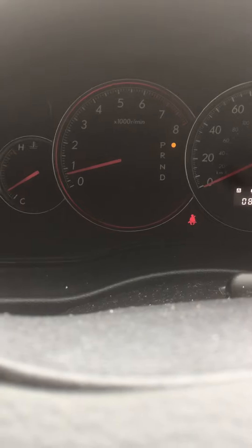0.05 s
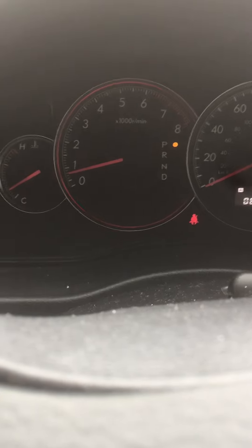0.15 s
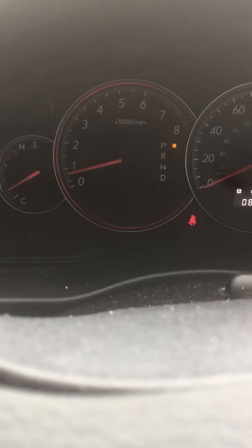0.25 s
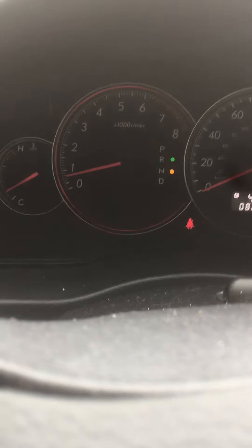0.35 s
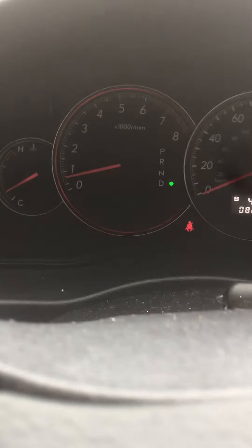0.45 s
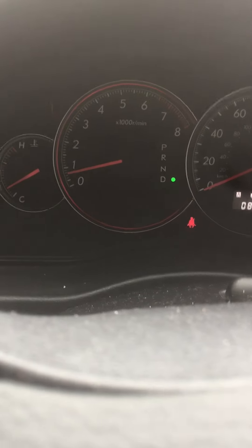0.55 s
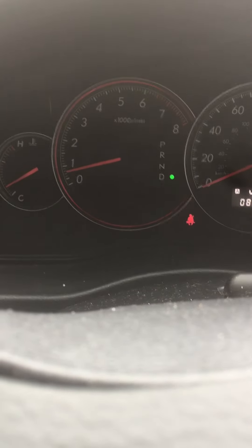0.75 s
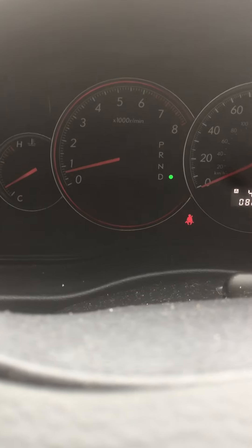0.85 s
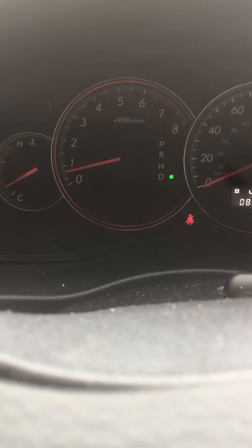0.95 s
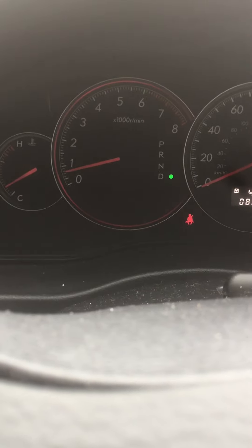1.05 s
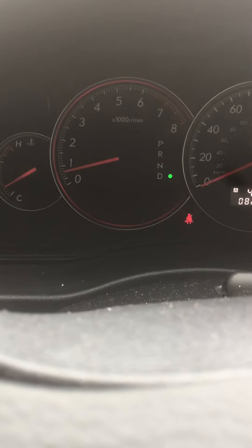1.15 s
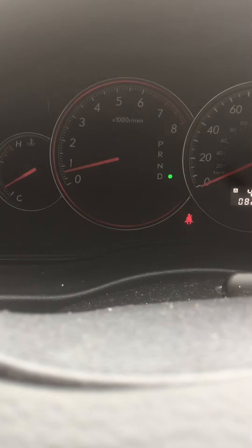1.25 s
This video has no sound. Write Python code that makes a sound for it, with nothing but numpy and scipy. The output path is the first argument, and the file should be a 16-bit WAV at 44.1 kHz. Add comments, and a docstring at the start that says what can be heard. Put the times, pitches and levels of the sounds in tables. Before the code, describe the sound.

A car's gear lever is shifted, heard inside the cabin over a low idling engine and faint fan hiss. The lock button clicks lightly from about 0.1 to 0.3 seconds. From 0.35 to 0.5 seconds the lever clatters loudly over plastic notches with hollow thumps, ending in a tiny spring buzz. From around 1 second the engine slows slightly and rumbles more roughly.

```python
"""Inside an idling car, the gear lever is pulled from park to drive.
The turning engine hums under the faint hiss of a fan. The lock button clicks, then the lever
clatters over its notches in bursts of tiny plastic hits and thumps the hollow console.
A spring buzzes as the lever settles, and there is a soft rustle before and after the shift.
As the gear takes hold, the engine slows a little and rumbles more roughly."""
import sys
import numpy as np
from scipy import signal
from scipy.fft import rfft, irfft
from scipy.io import wavfile
from scipy.ndimage import uniform_filter1d

SR = 44100
rng = np.random.default_rng(int(sys.argv[2]) if len(sys.argv) > 2 else 0)


def store_pcm(level_fs):
    """Save levels as 16-bit WAV."""
    pcm = np.round(np.clip(level_fs, -1, 1) * 32767).astype(np.int16)
    wavfile.write(sys.argv[1], SR, np.atleast_2d(pcm).T)


N = 57330
T = np.arange(N) / SR
HZ = np.fft.rfftfreq(N, 1 / SR)

# Levels in the tables are relative. A "fade" is the time a sound takes to drop by 60 dB.
# the engine over time: t/s, shaft speed f/Hz, hum level/dB, rumble level/dB
ENGINE_COURSE = [(0, 25.23, -1.5, -26), (0.151, 25.19, -4.5, 6), (0.268, 26.45, -19, 12.5),
                 (0.518, 26.28, 4, 4.5), (0.612, 26.7, -8, -10.5), (0.691, 25.02, 4, -9),
                 (0.818, 25.73, -2.5, 2.5), (0.971, 25.09, -0.5, -6), (1.04, 24.42, 3, 5),
                 (1.15, 23.56, -5.5, 8.5), (1.222, 25.47, 6, 7), (1.3, 24, -6, 10)]
# tones of the hum: multiple of the shaft speed, level/dB
HUM_TONES = [(2, -38.5), (3, -44), (4, -44.5), (5, -51.5), (6, -60.5), (7, -56.5), (8, -59.5)]
# tone colours of the engine's rumble and the fan's hiss: f/Hz, level/dB
RUMBLE_COLOUR = [(20, -29), (36, -12), (50, 10.5), (80, 0.5), (115, 4.5), (160, -5.5), (205, -3),
                 (260, -12), (350, -18.5), (480, -29.5), (800, -28.5), (1200, -49), (2500, -49),
                 (6000, -96)]
FAN_COLOUR = [(180, -25.5), (300, 0), (348, 2), (385, -17), (462, -7.5), (555, -21), (593, -12),
              (667, -15.5), (978, -8.5), (1170, -23), (1360, -22.5), (1610, -23.5), (16000, -42)]
# pitch bands of the air ducts and of the rustles: f/Hz, width/Hz, level/dB
DUCT_BANDS = [(343, 85, -69.5), (950, 33, -71.5), (1342, 65, -77.5)]
RUSTLING_BANDS = [(740, 1000, 2), (2150, 860, -4), (3700, 1900, -5.5)]
# soft rustles: t/s, hold/s, level/dB
RUSTLE_TIMES = [(0.0, 0.028, -64), (0.736, .03, -73.5)]
# lock button and slack in the lever: t/s, rise/s, hold/s, clack level/dB, ring level/dB, tick level/dB
BUTTON_CLICKS = [(0.133, .01, 0.0094, -55, -62, -64.5), (0.154, 0.0035, .005, -49.5, -49, -59),
                 (0.164, 0.002, 0.024, -57.5, -54.5, -62.5), (0.1922, .0015, 0.0046, -41.5, -40.5, -48),
                 (0.212, 0.0021, 0.014, -45.5, -45, -49.5), (0.225, 0.00033, 0.00096, -44, -43, -57),
                 (0.291, .002, 0.0039, -67, -50, -68), (0.311, 0.0013, 0.0024, -49.5, -44, -85)]
# the lever passing its notches: same columns as the clicks
NOTCHES = [(0.3475, 0.0038, 0.0032, -22.5, -23.5, -36.5), (0.3535, 0.0008, 0.0012, -36, -25, -34.5),
           (0.3660, 0.0015, 0.0023, -33.5, -32.5, -43.5), (0.3828, 0.00088, 0.008, -36.5, -33, -42.5),
           (0.3912, 0.006, 0.016, -34, -41, -50.5), (0.4105, 0.0034, 0.006, -29, -20.5, -31.5),
           (0.4465, 0.0032, .003, -28.5, -24.5, -35.5), (0.4515, 0.0011, 0.0034, -25.5, -27, -34),
           (0.4670, 0.0016, 0.0033, -34, -32.5, -45.5), (0.475, 0.0023, 0.0055, -50, -53, -60)]
# ringing tones of the lever and its gate, the slot it slides in: f/Hz, level/dB, fade/s (capped below)
GATE_TONES = [(650, -10, 0.068), (720, -16, 0.059), (794, 12, 0.052), (806, -5, 0.06), (958, 3.5, 0.034),
              (1101, -0.5, 0.071), (1357, -5.5, 0.067), (1378, 2, 0.022), (1680, -16, 0.031),
              (1650, -0.5, 0.063), (1962, -9, 0.063), (2370, -31, 0.069)]
# tone colours of the woody clack, the trim panel and the bright tick: f/Hz, level/dB
CLACK_COLOUR = [(200, -31.5), (450, -9), (620, -0.5), (900, -2), (1400, -4.5), (1900, -1.5), (2300, -13),
                (2700, -20.5), (4000, -46), (16000, -67)]
PANEL_COLOUR = [(120, -28.5), (230, -4), (300, -0.5), (390, -2.5), (480, -24.5), (900, -40), (4000, -83)]
TICK_COLOUR = [(300, -35.5), (1500, -8), (2600, -3), (4000, 4), (4900, -3), (5900, 2), (7500, -5),
               (9500, -6.5), (11000, -9), (13500, -9), (16000, -15.5)]
# the lock's catch snapping free: t/s, fade/s, level/dB
CATCH_SNAP = (0.2305, 0.024, -42)
# tone colour of that snap: f/Hz, level/dB
CATCH_COLOUR = [(2500, -20), (3800, -1), (4600, 4), (5400, 3.5), (6300, -12), (7300, -3), (8700, -10),
                (9500, 7.5), (10300, -24), (12900, -6), (15500, -26)]
# the lever's linkage leaving park: t/s, f/Hz, level/dB, fade/s, rise/s
LINKAGE_BUMP = (0.33, 112, -9, 0.11, 0.14)
# blows that reach the console: t/s, level/dB
CONSOLE_BLOWS = [(0.3484, -21.5), (0.3613, -12), (0.4006, -15.5), (0.4073, -16), (0.4217, -10),
                 (0.4482, -10.5), (0.4601, -10), (0.797, -46.5)]
# ringing tones of the hollow console: f/Hz, level/dB, fade/s
CONSOLE_TONES = [(73, -4, 0.097), (124, -14.5, 0.18), (142.6, 8, 0.0566), (169.3, 6.5, 0.078),
                 (191.3, -7.5, 0.072), (238.5, -6.5, 0.071), (283.3, -10.5, 0.098)]
# the return spring buzzing: t/s, hold/s, level/dB
SPRING_BUZZ = (0.4608, 0.026, -50)
# pitch bands of that buzz: f/Hz, width/Hz, level/dB
BUZZ_BANDS = [(2880, 280, -6.5), (3800, 530, 1), (4100, 240, -3), (6160, 570, -21)]


def amp(db):
    """Turns decibels into a number to multiply by."""
    return 10 ** (np.asarray(db) / 20)


def unit(x):
    """Scales a signal to an average strength (rms) of 1."""
    return x / np.sqrt(np.mean(x ** 2) + 1e-20)


def shape(points):
    """Joins (f/Hz, level/dB) points into a gain for every frequency."""
    hz, db = np.transpose(points)
    return amp(np.interp(np.log(HZ + 1), np.log(hz + 1), db))


def noise(gain):
    """Noise of strength 1, shaped by a gain for every frequency."""
    return unit(irfft(rfft(rng.standard_normal(N)) * gain, N))


def band_noise(bands):
    """Noise gathered around a few pitches."""
    return sum(amp(db) * noise(1 / (1 + (2 * (HZ - hz) / width) ** 2)) for hz, width, db in bands)


def colour(points):
    """How a part with this tone colour answers one sharp tap."""
    cepstrum = irfft(np.log(shape(points)), N)
    cepstrum[1:N // 2] *= 2  # this folding keeps the answer from starting before the tap
    cepstrum[N // 2 + 1:] = 0
    return irfft(np.exp(rfft(cepstrum)), N)


def through(x, response):
    """Plays x through a thing's answer to one tap, scaled to an energy of 1."""
    return signal.fftconvolve(x, response / np.linalg.norm(response))[:N]


def decay(t, fade):
    """Falls by 60 dB every `fade` seconds once t passes zero."""
    return np.exp(-np.log(1000) * np.maximum(t, 0) / fade)


def swell(start, rise):
    """Climbs softly from 0 to 1."""
    return 1 - np.exp(-(np.maximum(T - start, 0) / rise) ** 2)


def burst(start, rise, hold, fade):
    """A loudness curve that rises, holds and dies away."""
    return np.clip((T - start) / rise, 0, 1) * decay(T - start - rise - hold, fade)


def ring(tones, start=0):
    """The dying tones of something struck."""
    t = np.maximum(T - start, 0)
    return sum(amp(db) * decay(t, fade) * np.sin(2 * np.pi * hz * t) for hz, db, fade in tones)


def engine(waver=0.13, waver_hz=8, throb=0.43, rumble_offset_db=-45):
    """The shaft makes a wavering hum, a rumble that throbs twice a turn and a tap every second turn."""
    times, shaft_hz, hum_db, rumble_db = np.transpose(ENGINE_COURSE)
    angle = 2 * np.pi * np.cumsum(np.interp(T, times, shaft_hz)) / SR
    slow = np.exp(-(HZ / waver_hz) ** 2)
    hum = np.zeros(N)
    for multiple, db in HUM_TONES:
        strength = amp(db) * np.sqrt(2) * (1 + waver * noise(slow))
        hum += strength * np.sin(multiple * angle + 2 * np.pi * rng.random())
    hum *= amp(np.interp(T, times, hum_db))
    rumble = noise(shape(RUMBLE_COLOUR)) * (1 + throb * np.cos(2 * angle))
    rumble *= amp(rumble_offset_db + np.interp(T, times, rumble_db))
    cycle = (angle - np.interp(0.898, T, angle)) / 2  # one of the taps lands at 0.898 s
    pulses = np.exp(10 * (np.cos(cycle) - 1))
    tap = pulses * band_noise([(955, 80, -59)])
    return hum + rumble + tap


def fan(hiss_db=-62):
    """Moving air hisses faintly, and the ducts bring out a few pitches."""
    return amp(hiss_db) * noise(shape(FAN_COLOUR)) + band_noise(DUCT_BANDS)


def rustles():
    """Two soft, short puffs of noise."""
    loudness = sum(amp(db) * burst(start, 0.0047, hold, fade=0.2) for start, hold, db in RUSTLE_TIMES)
    return loudness * band_noise(RUSTLING_BANDS)


def contacts(hits_per_s=1300, spread_db=4, scrape=0.7):
    """Plastic rubbing on plastic: tiny random hits over a fine scrape."""
    hits = (rng.random(N) < hits_per_s / SR) * rng.choice([-1, 1], N)
    hits = hits * amp(spread_db * rng.standard_normal(N))
    force = unit(hits) + scrape * rng.standard_normal(N)
    return force / np.sqrt(uniform_filter1d(force ** 2, size=260) + 1e-9)  # evened out over about 6 ms


def lever(level_db=-2.5, panel_db=-1, longest_ring_s=0.048):
    """Each click or notch is a short rattle that sets off a woody clack, a ring and a bright tick."""
    force = contacts()

    def rattle(rows, column, fade=0.051):
        power = sum((amp(row[column]) * burst(*row[:3], fade)) ** 2 for row in rows)
        return force * np.sqrt(power)

    events = NOTCHES + BUTTON_CLICKS
    gate = ring([(hz, db, min(fade, longest_ring_s)) for hz, db, fade in GATE_TONES])
    clack = through(rattle(events, column=3), colour(CLACK_COLOUR))
    panel = through(rattle(NOTCHES, column=3), colour(PANEL_COLOUR))  # only the notches shake the trim
    ringing = through(rattle(events, column=4), gate)
    tick = through(rattle(events, column=5, fade=0.068), colour(TICK_COLOUR))
    return amp(level_db) * (clack + amp(panel_db) * panel + ringing + tick)


def lock_catch():
    """The catch springs free with a very short, bright snap."""
    start, fade, db = CATCH_SNAP
    force = amp(db) * contacts() * burst(start, rise=0.00033, hold=0.00059, fade=fade)
    return through(force, colour(CATCH_COLOUR))


def console(boom_rise_s=0.0062):
    """The linkage gives one soft, low bump, and the hollow console booms at each blow."""
    start, hz, db, fade, rise = LINKAGE_BUMP
    bump = ring([(hz, db, fade)], start) * swell(start, rise)
    booms = sum(amp(db) * ring(CONSOLE_TONES, t) * swell(t, boom_rise_s) for t, db in CONSOLE_BLOWS)
    return bump + booms


def spring():
    """The return spring buzzes briefly as the lever settles."""
    start, hold, db = SPRING_BUZZ
    loudness = amp(db) * burst(start, 0.0064, hold, fade=0.017) * decay(T - start, fade=0.3)
    return loudness * band_noise(BUZZ_BANDS)


def cabin(x, echo_db=-17, fade_s=0.11):
    """Adds the cabin's echo, which the soft upholstery soon soaks up."""
    echo = rng.standard_normal(N) * decay(T, fade_s) * swell(start=0.0074, rise=0.0039)
    return x + amp(echo_db) * through(x, echo)


def scene():
    """The gear shift over the engine and fan, in one channel."""
    small_sounds = lever() + lock_catch() + spring() + rustles()
    return (cabin(small_sounds) + console() + engine() + fan())[None]


def record(dry, low_hz=31.7, high_hz=16200):
    """The microphone drops the deepest bass; then the highest treble is cut off steeply."""
    bass_cut = signal.butter(3, low_hz, "high", fs=SR, output="sos")
    treble_cut = signal.butter(20, high_hz, fs=SR, output="sos")
    thinned = signal.sosfiltfilt(bass_cut, dry, padlen=4000)
    return signal.sosfiltfilt(treble_cut, thinned)


dry = scene()
out = record(dry)
store_pcm(out)
```